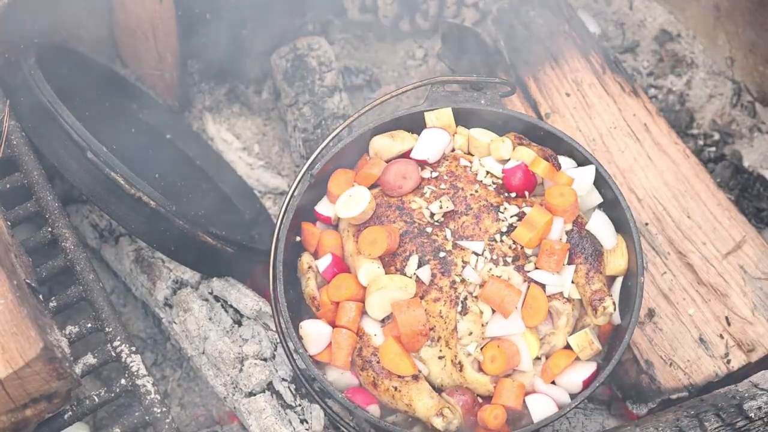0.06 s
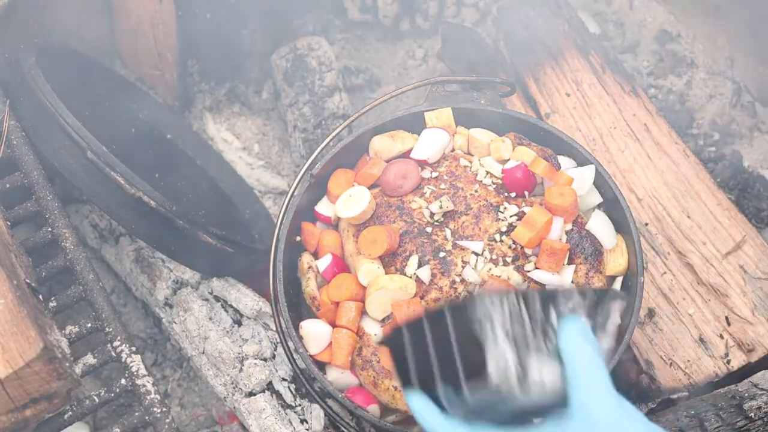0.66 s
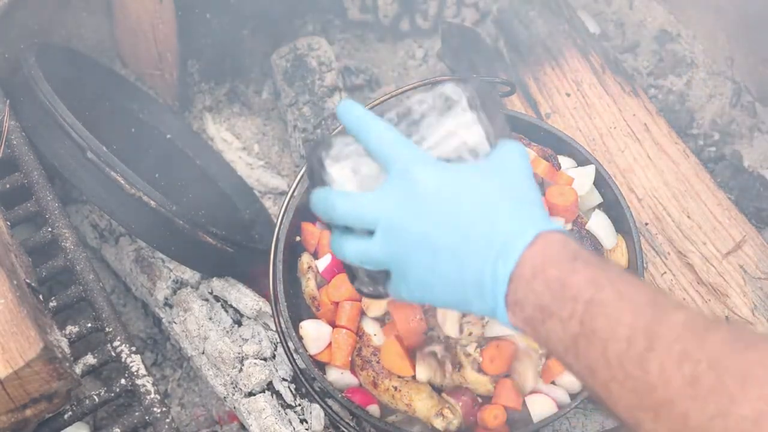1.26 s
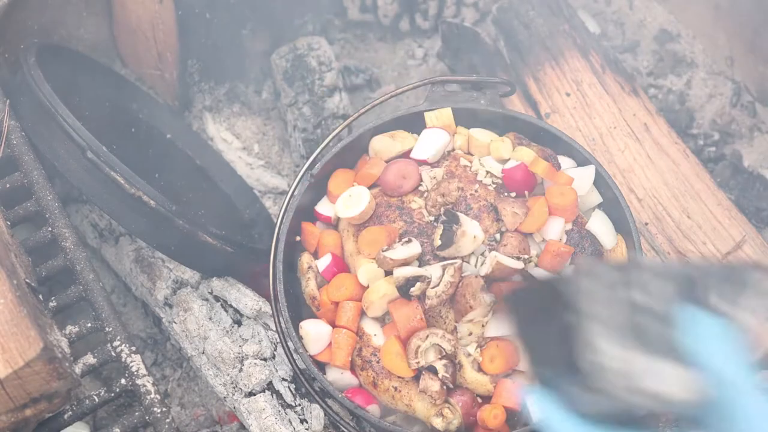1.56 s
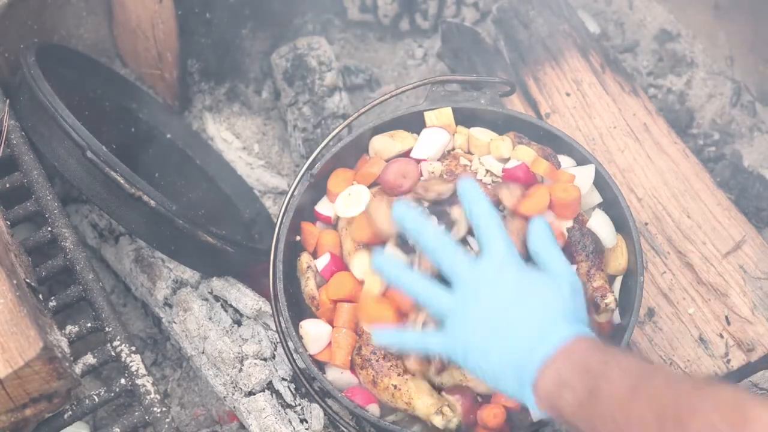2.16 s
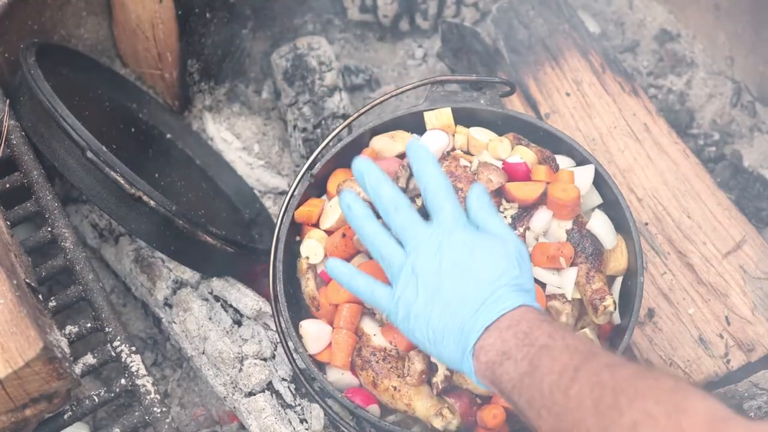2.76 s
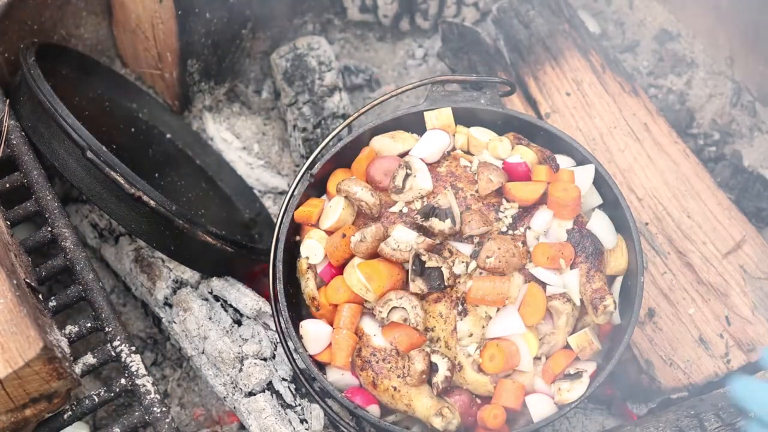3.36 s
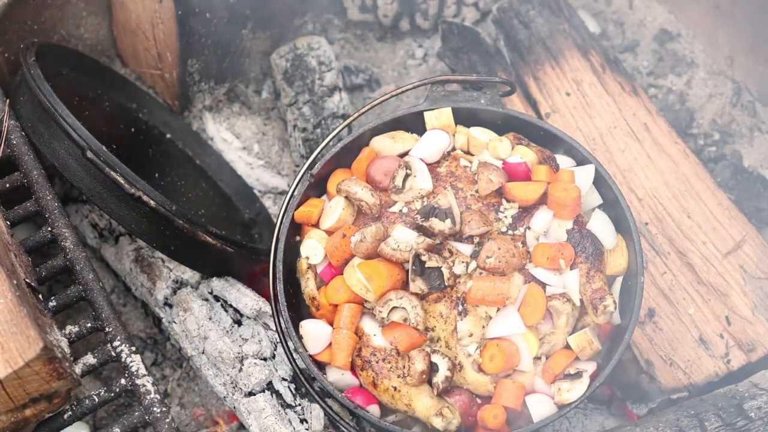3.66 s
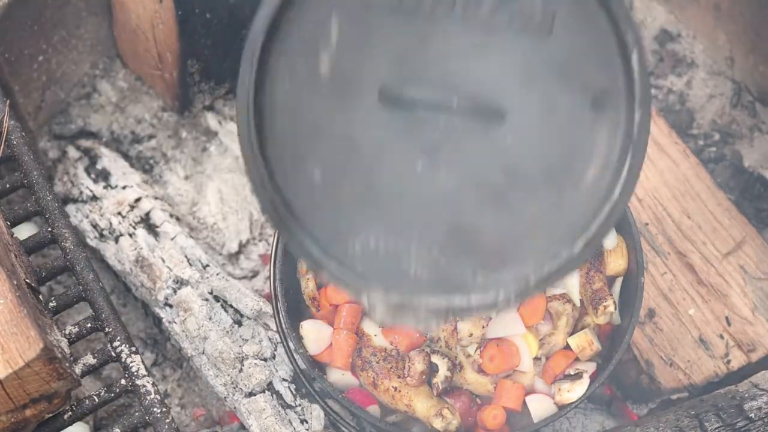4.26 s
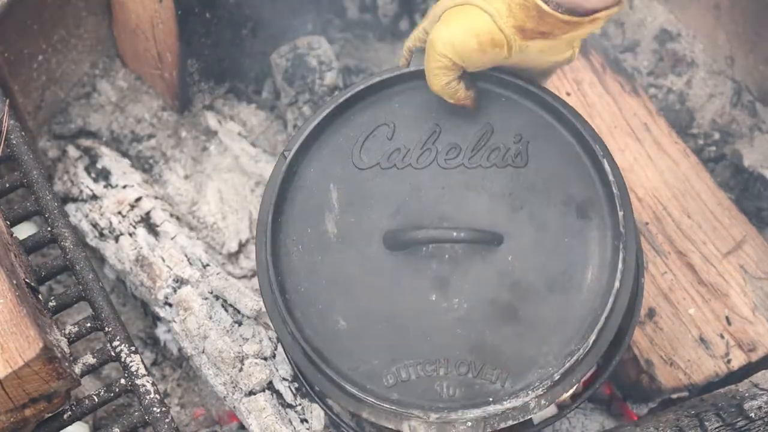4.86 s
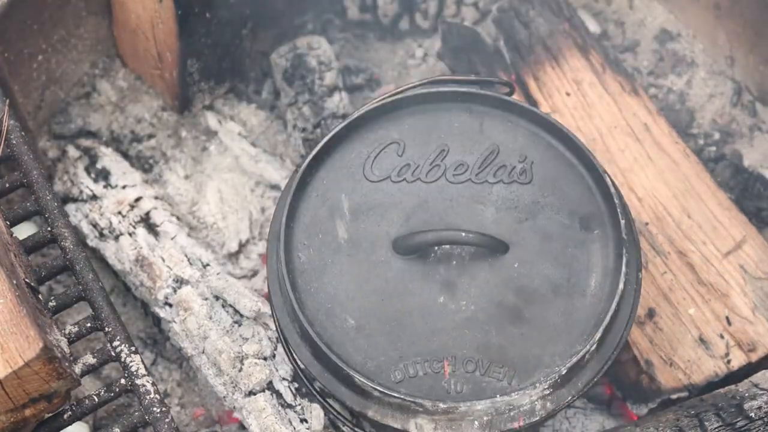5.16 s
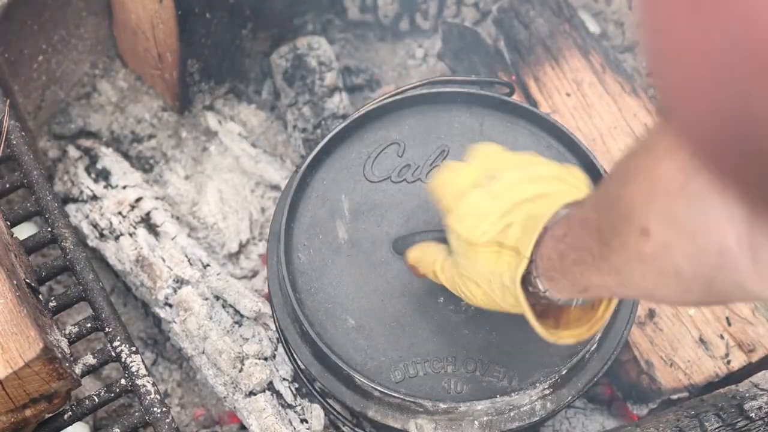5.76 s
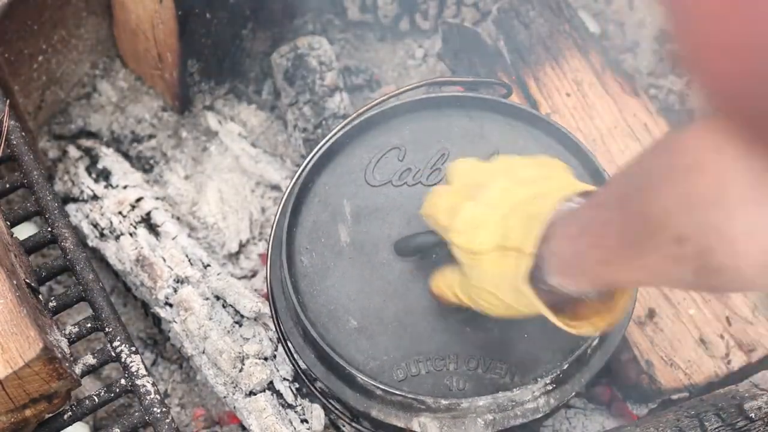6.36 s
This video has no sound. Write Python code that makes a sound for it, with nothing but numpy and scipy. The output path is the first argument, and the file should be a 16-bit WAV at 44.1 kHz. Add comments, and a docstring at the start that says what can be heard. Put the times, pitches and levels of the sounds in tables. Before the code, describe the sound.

Soft sizzling and spitting over a low fire rumble, until a cast iron lid knocks against the pot and lands with a loud ringing clank.

```python
"""Outdoors at a campfire, one microphone close to a cast iron pot on the embers. Meat and vegetables
sizzle over the fire's low rumble: juices bubble, steam escapes, fat spits. Mushrooms are tipped in and
patted down while wind brushes the microphone. Near 4 s the level dips briefly, then the sizzle is
quieter. The heavy iron lid scrapes onto the rim and rings, drops into its seat with a loud clank at 5 s
and muffles the sizzle. A second later a gloved hand shifts it once more, and steam slips out."""
import sys
import numpy as np
from scipy import signal
from scipy.fft import rfft, irfft, next_fast_len
from scipy.io import wavfile
from scipy.ndimage import uniform_filter1d

SR = 44100
rng = np.random.default_rng(int(sys.argv[2]) if len(sys.argv) > 2 else 0)


def wav_record(signal):
    """Record a signal, one row per channel, as 16-bit PCM in the file named by sys.argv[1]."""
    frames = np.transpose(np.atleast_2d(signal))
    bounded = np.clip(frames, -1, 1)
    # unit amplitude maps onto the largest positive 16-bit level
    quanta = np.round(bounded * 32767).astype(np.int16)
    wavfile.write(sys.argv[1], SR, quanta)


N = 282240
T = np.arange(N) / SR

# how hard the open pot boils: (time [s], level [dB])
BOIL_LEVEL = [(.05, -56.5), (.36, -55.5), (.7, -58), (1.3, -59.5), (1.8, -58.5), (2.25, -60), (2.65, -59),
              (3.15, -56), (3.6, -55), (3.74, -52.5), (3.84, -54.5)]
# how far the lid shuts the sizzle in: (time [s], share [0-1])
LID_COVER = [(4.05, 0), (4.7, 0.27), (5.15, 0.06), (5.38, 1), (5.7, 1), (6.2, 0.53), (6.39, 1)]
# swells of sound, each: (time [s], hold [s], level [dB])
FAT_FLARES = [(-.05, 0.099, -59.5), (.19, .02, -55.5), (.76, 0.55, -63), (1.52, 0.12, -54.5),
              (2.39, 0.13, -57.5), (2.76, 0.026, -54.5), (3.8, 0.021, -61.5), (4.88, .06, -61),
              (5.71, .05, -68), (5.93, .02, -62), (6.05, 0.041, -65.5)]  # fat flares up in a fine, bright fizz
STEAM_JETS = [(-.05, 0.28, -61), (.55, 0.11, -68), (.93, .1, -59.5), (2.8, .17, -62), (3.47, 0.066, -56),
              (6.07, 0.043, -52.5), (6.18, 0.016, -57)]  # steam escapes from the food or from under the lid
RIM_SCRAPES = [(4.7475, .016, -26), (5.978, 0.0086, -44.5)]  # the lid's edge grates along the rim
MUSHROOM_TUMBLES = [(.79, 0.029, -56.5), (1.72, 0.063, -59)]  # slices fall onto the food
WIND_GUSTS = [(2.35, .16, -52), (2.52, 0.043, -41.5), (2.68, 0.073, -43.5), (2.95, 0.069, -50.5)]  # wind on the microphone
# the loudest spits of fat: (time [s], level [dB])
FAT_SPITS = [(.416, -41), (.92, -40), (.99, -43), (1.1478, -39), (1.5364, -38), (2.4917, -37),
             (2.7826, -33), (2.8503, -37), (2.9402, -32), (2.948, -34.5), (3.3487, -33), (3.704, -41),
             (4.094, -41.5), (4.554, -43), (5.9358, -43.5), (6.127, -34.5), (6.221, -44), (6.23, -40.5)]
# soft knocks of food and glove, and plops of juice: (time [s], level [dB], pitch [Hz], t60 [s])
SOFT_PLOPS = [(1.761, -44, 750, 0.027), (1.79, -43.5, 750, .03), (1.811, -42.5, 950, 0.026),
              (2.553, -39.5, 134.3, .084), (2.62, -41.5, 100, 0.14), (3.028, -50.5, 298, 0.19),
              (3.494, -46, 400, 0.11), (3.81, -54, 1200, 0.02), (4.303, -45.5, 2600, 0.014),
              (5.942, -47.5, 463, 0.29), (6.127, -45, 600, .042), (6.229, -43, 785, 0.037)]
# iron on iron: (time [s], place, ring [dB], clank [dB], thump [dB], contact bandwidth [Hz], clank t60 [s])
LID_BLOWS = [(4.748, "front", -26.5, -22.5, -17.5, 3400, 0.049),
             (4.782, "front", -20, -21.5, -17.5, 1010, .04), (4.7895, "front", -43, -38, -50, 8000, 0.059),
             (4.991, "front", -27.5, -40, -38, 650, .08), (5.0186, "flat", -9, -12.5, -8.5, 9300, 0.085),
             (5.034, "flat", -29, -23, -32, 1200, 0.068), (5.0465, "flat", -34, -30, -36, 1500, .035),
             (5.071, "flat", -48.5, -38, -51.5, 900, 0.055),
             (5.9777, "side", -45.5, -38.5, -50, 3400, 0.054),
             (5.9893, "side", -31.5, -33, -26.5, 2370, 0.076),
             (6.0235, "side", -41.5, -30, -36, 1000, 0.042)]
# modes of the lid on the pot: (loose pitch [Hz], seated pitch [Hz], loose t60 [s], seated t60 [s],
# level hit at the front [dB], level hit flat [dB], level hit at the side [dB])
IRON_MODES = [(404, 404, .1, 0.33, -30, -32, -14), (529.5, 519, 0.463, 0.18, -7, -13.5, -4.5),
              (747, 742, 0.066, 0.12, -14, -10, 3.5), (869.5, 850, .03, 0.036, -14.5, -4, -12),
              (955, 934, 0.62, 0.11, -9.5, -5, -8), (1505, 1503, 0.074, .15, -15, -8.5, -5),
              (1564, 1560, 0.36, .1, -22, -25.5, -5.5), (2054, 2020, 0.22, 0.061, -8, -3, -22.5),
              (2200, 1500, .18, 0.099, -24.5, -19.5, -5), (2480, 2447, 0.21, .14, -2.5, -6.5, -23),
              (2616, 2601, .36, .13, -16.5, -19.5, -24), (2850, 3300, .1, 0.089, -21, -21.5, -12),
              (3082, 3024, .11, .15, 1, -18, -20.5), (3195, 3400, .1, .15, -10, -17.5, -20),
              (3360, 3287, 0.08, 0.061, -5, -3.5, -10), (3400, 3456, 0.075, .17, -2.5, -19, -16),
              (3816, 3770, .15, 0.22, -11.5, -24, -12.5), (4200, 4199, 0.13, 0.088, -4, -10, -5),
              (4540, 4515, .05, 0.15, -21, -19, -11), (4630, 4596, .05, .075, -23, -8, -18),
              (5500, 6000, .1, .1, -11, -19, -17), (6100, 5400, .12, .14, -8, -28.5, -17)]
PLACES = ("front", "flat", "side")

# spectra, each: (frequency [Hz], relative level [dB])
JUICE_SPECTRUM = [(150, -21), (400, -9.5), (640, -9.5), (850, 1), (1150, -0.5), (1450, 0.5), (2100, -2.5),
                  (2700, -2.5), (4100, -6), (5000, -10), (7000, -22), (14000, -37.5)]  # bubbling juices
STEAM_SPECTRUM = [(1500, -35), (2600, -14), (2900, -3.5), (3120, 1), (3350, -3.5), (3650, -9.5),
                  (4400, -13), (6000, -35)]  # escaping steam
SPRAY_SPECTRUM = [(1500, -22.5), (4000, -5), (6000, 1), (8000, -0.5), (9800, 0.5), (11500, -4.5),
                  (15800, -20)]  # droplets of fat
MIST_SPECTRUM = [(5000, -25.5), (9000, -8), (11500, -3), (14000, 0.5), (15800, -4)]  # the finest mist of fat
CLANK_SPECTRUM = [(50, -28.5), (110, -12.5), (190, -3.5), (255, 2), (320, -14.5), (430, -3), (620, -3),
                  (720, 2), (880, 6.5), (1120, -12.5), (1400, -6.5), (1820, -0.5), (2300, -5), (3300, -1),
                  (4500, -6.5), (7000, -15.5), (15000, -28)]  # the full pot, struck
SCRAPE_SPECTRUM = [(80, -18), (170, -4), (330, -10.5), (800, -1.5), (1100, -7.5), (1350, 5.5),
                   (1800, -16.5), (2700, -7.5), (3200, 6.5), (4600, -13.5), (5300, -2), (6800, -6.5),
                   (9000, -11.5), (15500, -18.5)]  # iron grating on iron
TUMBLE_SPECTRUM = [(120, -12), (300, -4), (700, 1), (1100, -8), (2000, -16), (6000, -35)]  # mushrooms landing
FIRE_SPECTRUM = [(18, -44), (30, -28), (42, -15.5), (57, -3.5), (72, 2), (100, -1.5), (125, -1.5),
                 (160, -15.5), (260, -28.5), (600, -47.5)]  # the fire's rumble
AIR_SPECTRUM = [(100, -1), (240, 0.5), (340, -4), (520, -4), (750, -5), (1200, -13.5), (3000, -27),
                (10000, -33)]  # open air
PUFF_SPECTRUM = [(1500, -10), (4000, 2.5), (6500, 1.5), (9000, -1.5), (14000, -0.5), (15800, -4.5)]
SPIT_SPECTRUM = [(1000, 1), (5000, -3.5), (10000, 3), (15000, -2.5)]
WIND_SPECTRUM = [(15, -14), (32, -5), (70, 1), (130, -8), (400, -49)]
ECHO_SPECTRUM = [(200, 2.0), (2400, -1.0), (3400, 11), (4400, 0), (14000, -1.5)]
# the whole sound dips briefly: (time [s], half width [s], depth [dB])
LEVEL_DIPS = [(.192, 0.021, -25.5), (3.928, 0.021, -23)]

SEATED_S = 5.017  # the lid drops into its seat
# after the second dip the sizzle is quieter, its treble more so
QUIETER_S, QUIETER_SIZZLE_DB, QUIETER_TREBLE_DB = 3.93, -6, -5


def sizzle():
    """Steam bubbles burst in the juices and fat sprays into a hiss; the falling lid squeezes out a puff."""
    bubbles = crackle(rate=2500, spread_db=3, hiss=0.73)
    pops = crackle(rate=1200, spread_db=3, hiss=0.84)
    droplets = crackle(rate=2500, spread_db=5, hiss=1.2)
    specks = crackle(rate=1000, spread_db=4, hiss=1)
    spit_clicks = clicks(rate=15, spread_db=2.5)
    small_spits = unit(signal.fftconvolve(spit_clicks, rng.standard_normal(SR) * fade(.004))[:N])
    flare = bursts(FAT_FLARES, attack=.07, t60=1)
    jet = bursts(STEAM_JETS, attack=0.049, t60=0.23)

    juice_gain = boil_gain(usual_db=-56.5, slope=1.07, shut_db=-13)
    simmer = colour(bubbles, JUICE_SPECTRUM) * juice_gain * waver(rate=30, spread_db=0.93)
    steam_gain = np.hypot(boil_gain(usual_db=-63, slope=1.3, shut_db=-10.5), jet)
    steam = colour(pops, STEAM_SPECTRUM) * steam_gain * waver(rate=70, spread_db=0.99)

    treble = undb(QUIETER_TREBLE_DB * (T > QUIETER_S))
    flung = np.hypot(undb(-4.5) * flare, undb(-9.5) * jet)  # flares and jets both fling extra spray
    spray_gain = np.hypot(treble * boil_gain(usual_db=-60, slope=.8, shut_db=-11), flung)
    mist_gain = np.hypot(treble * boil_gain(usual_db=-64, slope=.5, shut_db=-8), flare)
    # spray and mist sputter together, and each also comes and goes a little on its own
    sputter = waver(rate=45, spread_db=.7)
    spray = colour(droplets + undb(-16.5) * small_spits, SPRAY_SPECTRUM)
    spray *= spray_gain * sputter * waver(rate=12, spread_db=0.9)
    mist = colour(specks, MIST_SPECTRUM) * mist_gain * sputter * waver(rate=12, spread_db=0.9)

    squeeze = undb(-39) * envelope(SEATED_S, attack=.004, hold=.022, t60=.11)
    puff = colour(specks * squeeze, PUFF_SPECTRUM)
    return simmer + steam + spray + mist + puff


def boil_gain(usual_db, slope, shut_db, usual_boil_db=-58):
    """One part of the sizzle follows the boil by slope dB per dB; the shut lid changes it by shut_db."""
    level_db = curve(BOIL_LEVEL) + QUIETER_SIZZLE_DB * (T > QUIETER_S)
    return undb(usual_db + slope * (level_db - usual_boil_db) + shut_db * curve(LID_COVER))


def spits():
    """Larger drops of fat burst with a short, sharp snap."""
    out = np.zeros(N)
    for s, db in FAT_SPITS:
        snap = rng.standard_normal(SR) * fade(0.0094)
        add(out, s, undb(db) * snap / np.abs(snap).max())
    return colour(out, SPIT_SPECTRUM)


def lid(thump_hz=192, thump_t60=0.033):
    """Each blow rings the lid, clanks the full pot and thumps it on the embers; the first touch grates."""
    out = np.zeros(N)
    thump = np.sin(2 * np.pi * thump_hz * T[:SR]) * fade(thump_t60) * (1 - fade(0.011))
    for s, place, ring_db, clank_db, thump_db, contact_hz, t60 in LID_BLOWS:
        # the pot's crowded modes die fast, and a softer contact passes less treble
        pot = colour(rng.standard_normal(SR) * fade(t60), CLANK_SPECTRUM)
        contact = signal.butter(2, contact_hz, fs=SR, output="sos")
        clank = signal.sosfilt(contact, pot)
        ring = lid_ring(s, place, contact_hz)
        add(out, s, undb(ring_db) * ring + undb(clank_db) * clank + undb(thump_db) * thump)
    grains = crackle(rate=3400, spread_db=2, hiss=.5)
    scrape = colour(grains * bursts(RIM_SCRAPES, attack=.003, t60=0.16), SCRAPE_SPECTRUM)
    return out + scrape


def lid_ring(s, place, contact_hz, bite=0.97, bite_t60=0.034):
    """The lid's modes after a blow at time s; seating on the rim shifts their pitch and decay."""
    seated = (place == "flat") | ((s < SEATED_S) & (s + T[:SR] >= SEATED_S))
    grip = 34 if place == "side" else 0  # extra loss per second while the glove pushes it
    out = np.zeros(SR)
    for k, (loose_hz, seated_hz, loose_t60, seated_t60, *shares_db) in enumerate(IRON_MODES):
        turns = np.cumsum(np.where(seated, seated_hz, loose_hz)) / SR
        loss = np.cumsum(grip + np.log(1000) / np.where(seated, seated_t60, loose_t60)) / SR
        share = undb(shares_db[PLACES.index(place)])
        reach = 1 / np.sqrt(1 + (loose_hz / contact_hz) ** 4)  # soft blows barely stir high modes
        out += (-1) ** k * share * reach * np.exp(-loss) * np.sin(2 * np.pi * turns)
    # friction at the rim eats the first, widest swings quickly
    return out * (1 - fade(0.0071)) * (1 + bite * fade(bite_t60))


def mushrooms():
    """Light slices land in a quick, dull patter."""
    patter = clicks(rate=350, spread_db=3) * bursts(MUSHROOM_TUMBLES, attack=0.027, t60=0.11)
    return colour(patter, TUMBLE_SPECTRUM)


def plops():
    """Soft things land and thick bubbles burst with a dead, noisy thud."""
    out = np.zeros(N)
    for s, db, hz, t60 in SOFT_PLOPS:
        body = signal.butter(2, [hz / 2.03, hz * 1.2], "band", fs=SR, output="sos")
        push = rng.standard_normal(SR)
        push /= np.std(signal.sosfilt(body, push))
        add(out, s, undb(db) * signal.sosfilt(body, push * fade(t60)))
    return out


def fire():
    """Under the pot the fire rumbles low, with a slow wander and a quick flutter."""
    gain = undb(-52) * waver(rate=3, spread_db=0.3) * waver(rate=15, spread_db=1.64)
    return noise(FIRE_SPECTRUM) * gain


def wind():
    """A few gusts brush the microphone and buffet it in the bass."""
    return noise(WIND_SPECTRUM) * bursts(WIND_GUSTS, attack=0.021, t60=0.47)


def open_air():
    """A faint, steady rush of air lies behind everything."""
    return noise(AIR_SPECTRUM) * undb(-60)


def surroundings(direct, near_db=-22, near_t60=.14, far_db=-37, far_t60=1.0):
    """The direct sound arrives with quick scatter from the fire pit and a faint tail from further off."""
    scatter = undb(near_db) * unit(rng.standard_normal(SR) * fade(near_t60))
    tail = undb(far_db) * unit(rng.standard_normal(SR) * fade(far_t60))
    response = colour((scatter + tail) / np.sqrt(SR), ECHO_SPECTRUM)
    return direct + signal.fftconvolve(direct, response)[:N]


def undb(db):
    """Decibels to gain."""
    return np.exp(np.asarray(db) * (np.log(10) / 20))


def unit(x):
    """Scale to rms 1."""
    return x / np.sqrt(np.mean(x ** 2))


def curve(rows):
    """Join (time [s], value) rows with straight lines."""
    return np.interp(T, *np.transpose(rows))


def colour(x, spectrum):
    """Causal filter with the given spectrum; white noise keeps its power."""
    size = next_fast_len(len(x) // 2 + 2048) * 2
    hz, db = np.transpose(spectrum)
    bin_hz = np.arange(size // 2 + 1) * SR / size
    gain = unit(undb(np.interp(np.log(bin_hz + 1), np.log(hz), db)))
    # minimum phase: nothing rings ahead of a click
    cepstrum = irfft(np.log(gain))
    cepstrum[1:size // 2] *= 2
    cepstrum[size // 2 + 1:] = 0
    return irfft(rfft(x, size) * np.exp(rfft(cepstrum)))[:len(x)]


def noise(spectrum):
    """Steady coloured noise at rms 1."""
    return unit(colour(rng.standard_normal(N), spectrum))


def clicks(rate, spread_db):
    """A random rain of clicks, rate per second, most small and a few large."""
    present = rng.random(N) < rate / SR
    size = undb(spread_db * np.minimum(rng.standard_exponential(N), 5))
    return unit(present * size * rng.choice([-1, 1], N))


def crackle(rate, spread_db, hiss):
    """Clicks over white hiss, together at rms 1."""
    return unit(clicks(rate, spread_db) + hiss * rng.standard_normal(N))


def waver(rate, spread_db):
    """A gain near 1 that drifts to a new random value rate times a second."""
    step = int(SR / rate)
    stairs = np.repeat(rng.standard_normal(N // step + 1), step)
    return undb(spread_db * unit(uniform_filter1d(stairs, step)[:N]))


def fade(t60):
    """Exponential decay, one second long."""
    return np.exp(-np.log(1000) * T[:SR] / t60)


def envelope(s, attack, hold, t60):
    """Rise from time s, hold, then die away; all in seconds."""
    fallen = np.clip((T - (s + attack + hold)) / t60, 0, 3)
    return np.clip((T - s) / attack, 0, 1) * np.exp(-np.log(1000) * fallen)


def bursts(rows, attack, t60):
    """Gain over time of (time [s], hold [s], level [dB]) swells that share an attack and a release."""
    return np.sqrt(sum((undb(db) * envelope(s, attack, hold, t60)) ** 2 for s, hold, db in rows))


def add(out, s, x):
    """Mix x into out at time s."""
    i = int(s * SR)
    out[i:i + len(x)] += x[:N - i]


def scene():
    """Pot and lid up close, fire and weather behind, in mono."""
    food = sizzle() + spits() + plops() + mushrooms()
    background = fire() + wind() + open_air()
    return (food + surroundings(lid()) + background)[None]


def record(dry, top_hz=15900):
    """The level dips briefly twice, peaks clip at full scale and the top is cut."""
    dip_db = sum(depth_db * np.exp(-np.abs((T - s) / width) ** 3) for s, width, depth_db in LEVEL_DIPS)
    clipped = np.clip(dry * undb(dip_db), -1, 1)
    return signal.sosfilt(signal.ellip(12, .1, 85, top_hz, fs=SR, output="sos"), clipped)


dry = scene()
out = record(dry)
wav_record(out)
```